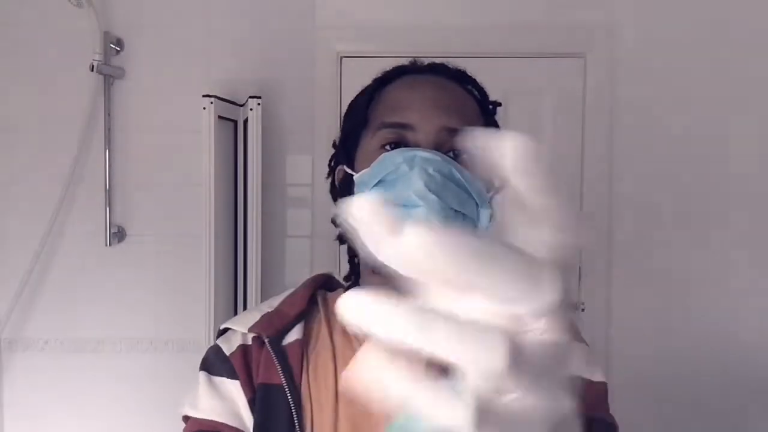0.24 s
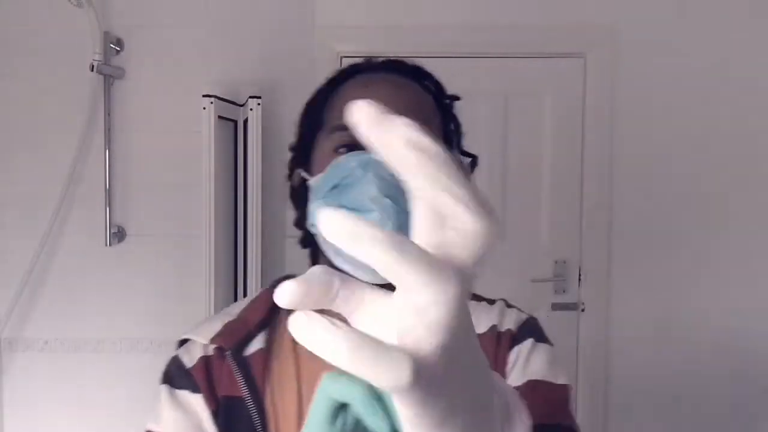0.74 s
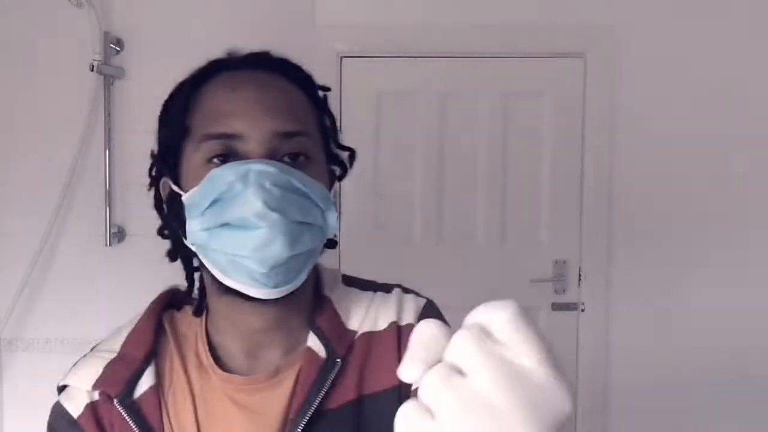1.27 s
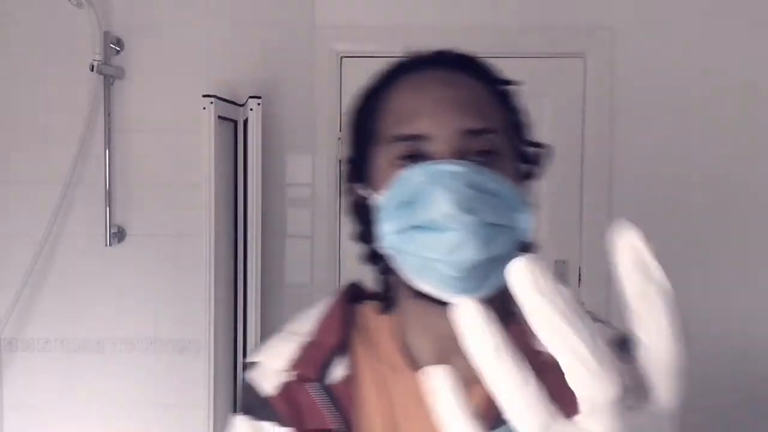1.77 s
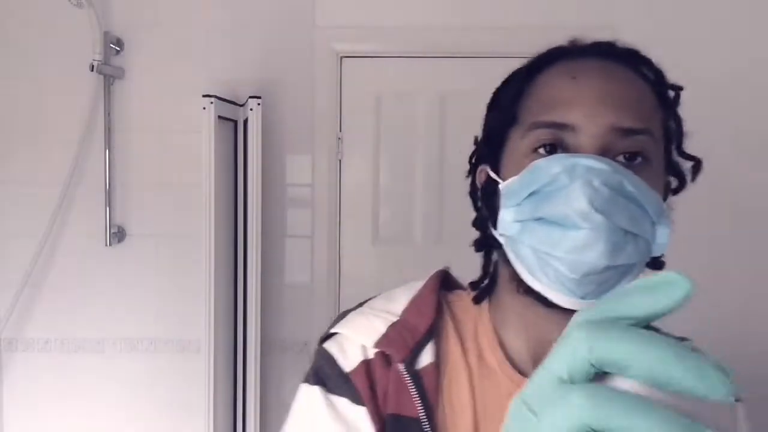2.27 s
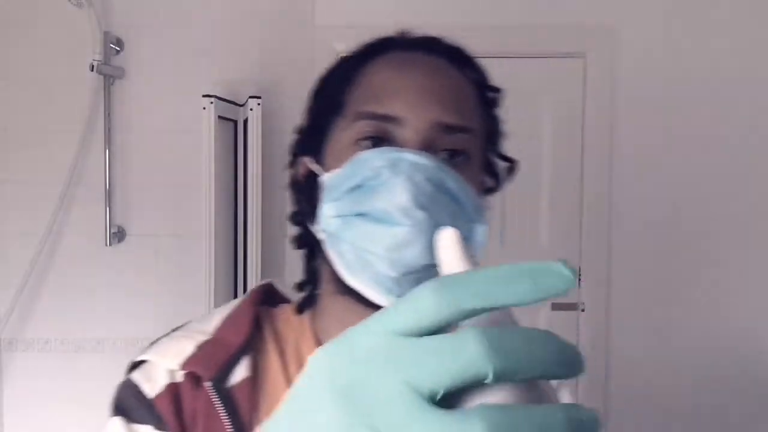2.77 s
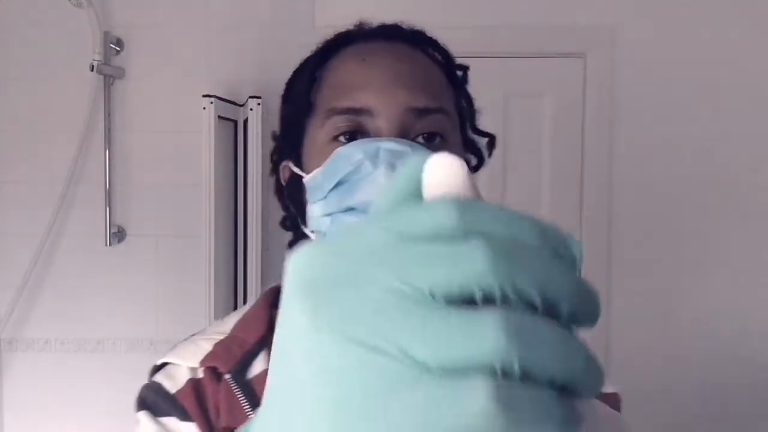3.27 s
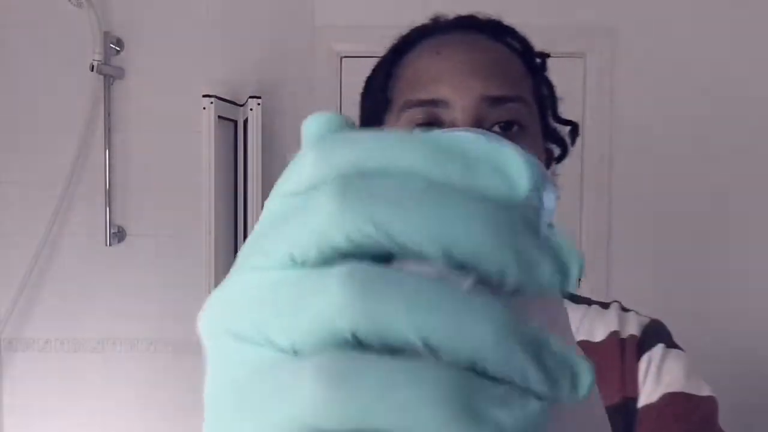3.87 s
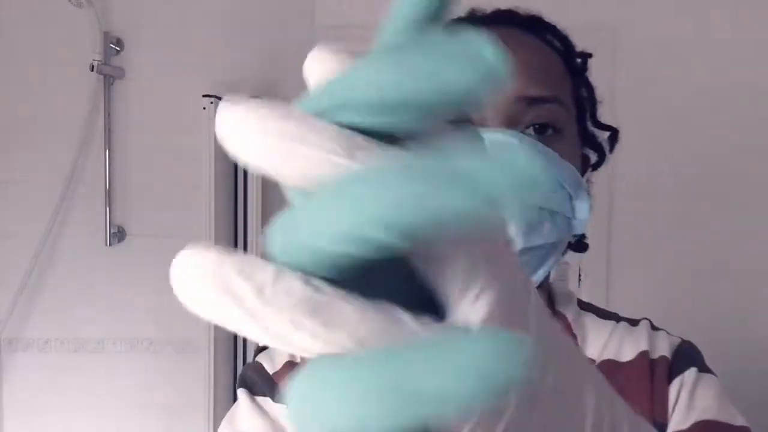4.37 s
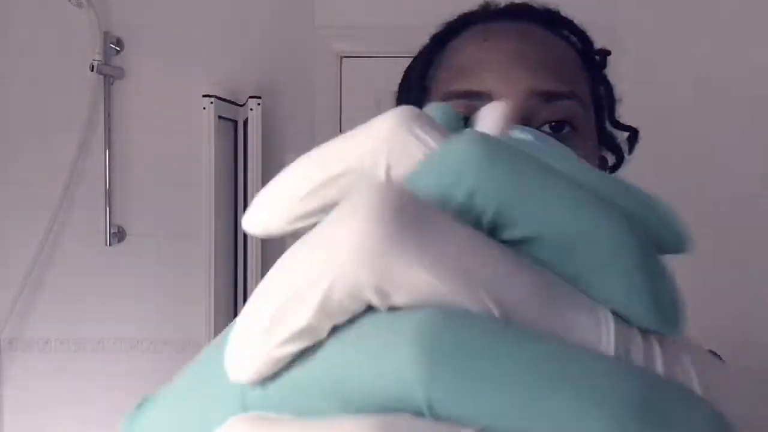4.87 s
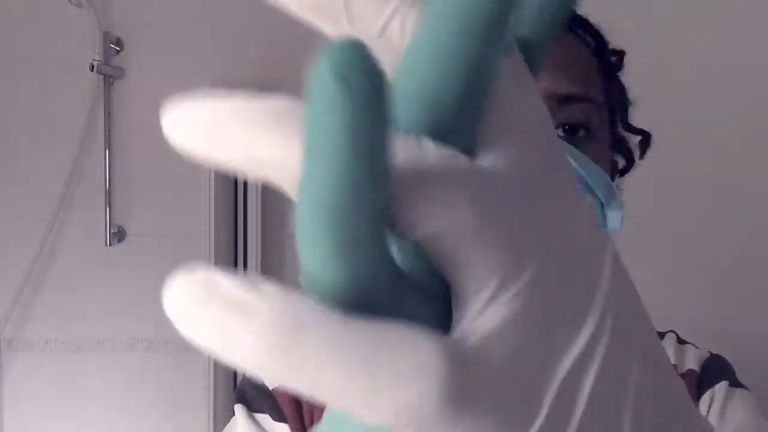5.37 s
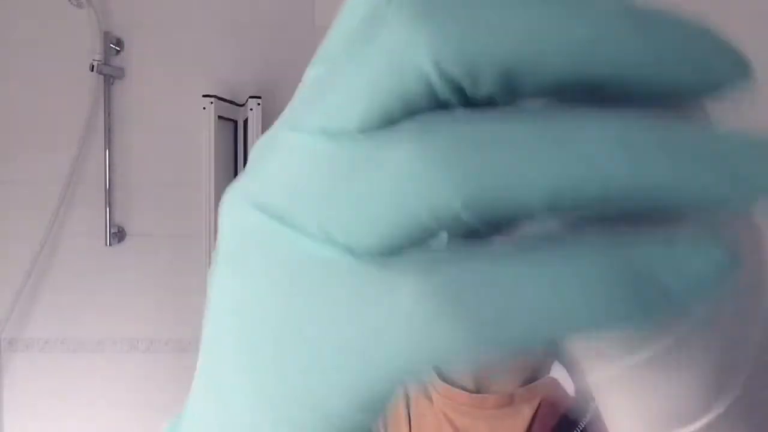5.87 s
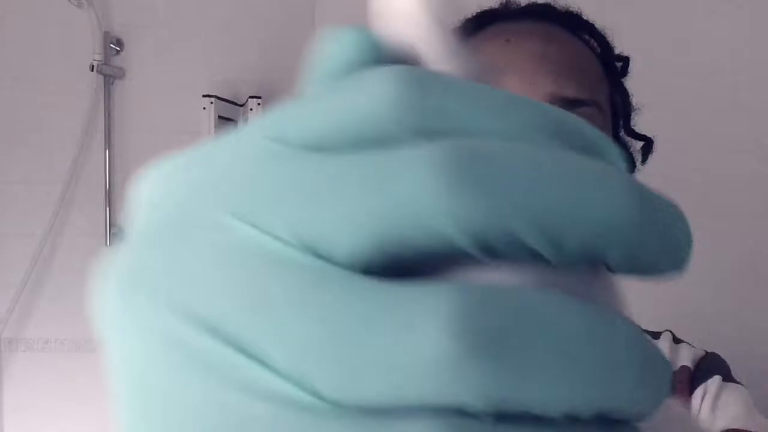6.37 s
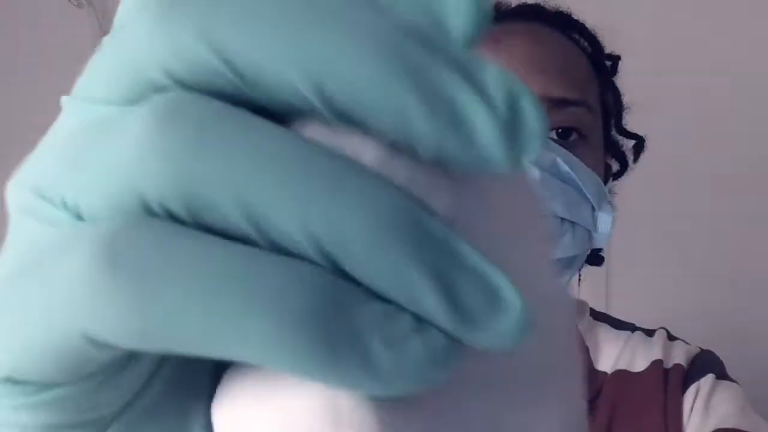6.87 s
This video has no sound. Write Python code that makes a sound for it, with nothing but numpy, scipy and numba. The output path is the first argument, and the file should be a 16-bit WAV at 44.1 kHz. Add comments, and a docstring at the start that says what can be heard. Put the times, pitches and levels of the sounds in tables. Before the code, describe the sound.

Latex gloves rubbed, crinkled and snapped close to a microphone in a small tiled room, building from faint rustles to loud, sharp cracks.

```python
"""Latex gloves are worked over two hands close to a microphone in a small tiled room.
Snaps of latex are noise bursts: an air pocket rings, with a smack, a crack and a slap around it;
a few are only rough grains in ringing tails and a thud. Stick-slip grains make swells of rub and hiss,
filtered noise a low rustle: mostly strokes, also room tail. Air puffs are decaying low swings.
Feet thud in the room's standing waves; tiles ring on as decaying noise over a low building rumble."""
import sys
import numpy as np
from scipy import signal
from scipy.io import wavfile
from numba import njit

SR = 44100
rng = np.random.default_rng(int(sys.argv[2]) if len(sys.argv) > 2 else 0)


def put_to_file(sound):
    """Save the sound as 16-bit audio at rate SR, in the file named by the first command-line argument."""
    columns = np.atleast_2d(sound).T  # one column per channel
    safe = np.clip(columns, -1, 1)
    whole_steps = np.round(safe * 32767)
    wavfile.write(sys.argv[1], SR, whole_steps.astype(np.int16))


N = 314860   # length in samples


def amp(db):
    """Decibels to gain."""
    return 10 ** (np.asarray(db) / 20)


def rms_one(x):
    """Scale to unit rms."""
    return x / np.sqrt(np.mean(x ** 2) + 1e-20)


def peak_one(x):
    """Scale to unit peak."""
    return x / np.max(np.abs(x))


def at_hz(points, hz):
    """Read a table on a log-frequency axis."""
    table_hz, values = np.transpose(points)
    return np.interp(np.log(hz), np.log(table_hz), values)


def in_time(rows):
    """Columns of a curve table at every sample."""
    s, *columns = np.transpose(rows)
    return [np.interp(np.arange(N) / SR, s, column) for column in columns]


def drift(rate_hz):
    """Slow random wander of rms 1: noise through two equal one-pole low-passes at rate_hz."""
    step = 40   # samples between drawn values
    r = np.exp(-2 * np.pi * rate_hz * step / SR)
    noise = rng.standard_normal(N // step + 2002)
    slow = signal.lfilter([1], [1, -2 * r, r * r], noise)[2000:]   # skip the filter's start
    return np.interp(np.arange(N) / step, np.arange(len(slow)), rms_one(slow))


def band_pass(x, low_hz, high_hz):
    """Keep what lies between two frequencies."""
    return signal.sosfilt(signal.butter(2, [low_hz, high_hz], "band", fs=SR, output="sos"), x)


def high_pass(x, hz):
    """Keep what lies above a frequency."""
    return signal.sosfilt(signal.butter(2, hz, "high", fs=SR, output="sos"), x)


def bands(x):
    """Half-octave slices of x with their centres; neighbours come from alternate rows."""
    edges = 22 * 2 ** np.arange(0, 9.9, .5)
    for k, (low, high) in enumerate(zip(edges, edges[1:])):
        yield np.sqrt(low * high), band_pass(x[k % 2], low, high)


def resonance(x, hz, width_hz):
    """Two-pole peak of gain 1."""
    r = np.exp(-np.pi * width_hz / SR)
    feedback = [1, -2 * r * np.cos(2 * np.pi * hz / SR), r * r]
    return signal.lfilter([(1 - r * r) / 2, 0, (r * r - 1) / 2], feedback, x)


@njit
def moving_resonance(x, cosine, r):
    """Two-pole peak whose centre changes every sample."""
    y = np.zeros(len(x))
    for i in range(2, len(x)):
        y[i] = x[i] - x[i - 2] + 2 * r * cosine[i] * y[i - 1] - r * r * y[i - 2]
    return y


def standing_waves(x):
    """The low resonances between the walls."""
    # Each row: frequency in Hz, width in Hz, level in dB.
    room_modes = [(95, 24, -6), (146, 14, -1), (161.7, 18.4, 4.5), (205, 11, 4.5), (230, 12.4, -2),
                  (316, 58, -1), (394, 19.2, -1), (452, 32, -2)]
    return sum((-1) ** k * amp(db) * resonance(x, hz, width_hz)
               for k, (hz, width_hz, db) in enumerate(room_modes))


def swells():
    """Each swell rises, holds and fades; the strongest one sets the shape of the hollow."""
    # Swells of rub, hiss and low rustle: mostly latex strokes, also the room's tail at the start and
    # after the thud. Each row: time it reaches full level in s, hold in s, rub, hiss and rustle in dB
    # ahead of the trims in rubbing(), hollow in Hz, its narrow ring over the broad rub in dB.
    swell_rows = [(0, .02, -44, -43, -53.5, 3080, -27), (0.334, 0.11, -55, -50, -81, 2850, -5),
                  (0.558, 0.05, -58.5, -55, -82, 2590, -8), (0.756, .09, -50, -46, -51.5, 1550, 1),
                  (0.937, .08, -57, -55, -57, 1400, -7), (1.257, 0.036, -49.5, -62.5, -57, 2840, -25),
                  (1.605, .06, -51.5, -67, -65, 1780, -35), (1.869, .08, -54, -49.5, -56, 1140, -8.5),
                  (2.371, .1, -55.5, -60, -47, 1190, -18), (2.619, .2, -52, -49, -57, 2520, -29),
                  (2.985, .06, -50, -60, -61, 2400, -0.5), (3.324, .18, -56, -48, -67, 2390, -5),
                  (3.568, .08, -48, -68, -78, 2240, -2), (3.729, .02, -42.5, -37, -52, 2280, -10),
                  (3.874, .05, -50.5, -43, -60, 2900, 5.5), (3.998, 0.064, -40, -35, -47.5, 1840, -4.5),
                  (4.42, .17, -64, -49, -68, 1660, -20), (4.613, .2, -57, -46.5, -60.5, 1520, 3.5),
                  (4.87, .07, -43, -34.5, -47.5, 1580, 0), (5.036, .08, -54, -54, -61, 1500, -3.5),
                  (5.266, .03, -55, -55, -80, 3900, -4), (5.491, .03, -47.5, -52, -60, 3000, -25),
                  (5.836, .03, -63.5, -40, -64, 2720, -19), (5.972, 0.065, -53.5, -45, -61, 2870, 0),
                  (6.121, .02, -48, -42, -71, 2770, -7), (6.236, .07, -49.5, -41, -53.5, 2540, 0.5),
                  (6.469, .12, -48, -43, -61, 1940, 0), (6.618, .12, -40, -63, -64, 1960, -6),
                  (6.796, .08, -46, -40, -57, 1930, 2.5), (6.971, .17, -39.5, -32, -48, 2970, 0)]
    # Rub, hiss and rustle between swells, in dB ahead of the same trims.
    resting_db = (-65.5, -57, -65)
    rises_db_per_s, fall_db_per_s = (280, 193, 500), 120   # rise of rub, hiss and rustle; common fall
    open_db = -8   # narrow ring of the hollow between swells

    t = np.arange(0, N + 64, 64) / SR
    s, hold, *levels_db, hz, closed_db = np.transpose(swell_rows)[..., None]
    fall_db = fall_db_per_s * np.maximum(t - s - np.abs(hold), 0)
    powers = [amp(db - rise * np.maximum(s - t, 0) - fall_db) ** 2
              for db, rise in zip(levels_db, rises_db_per_s)]
    gains = [np.sqrt(power.sum(axis=0) + amp(rest_db) ** 2)
             for power, rest_db in zip(powers, resting_db)]

    # The steep power lets the strongest rub decide.
    lead, rest = powers[0] ** 4, amp(resting_db[0]) ** 8
    total = lead.sum(axis=0)
    hollow_hz = np.sum(lead * hz, axis=0) / total
    ring_db = (np.sum(lead * closed_db, axis=0) + rest * open_db) / (total + rest)
    return [np.interp(np.arange(N) / SR, t, curve) for curve in gains + [hollow_hz, ring_db]]


def grains(per_s, spread_db):
    """Two rows of random slips of uneven size on a bed of noise."""
    uneven = amp(spread_db * np.minimum(rng.exponential(1, (2, N)), 3.5))
    sizes = uneven * rng.standard_normal((2, N))
    slipping = rng.random((2, N)) < per_s / SR
    return sizes * slipping + 0.27 * rng.standard_normal((2, N))


def rubbing(rub_gain, hiss_gain, rustle_gain, hollow_hz, ring_db):
    """Stick-slip grains make a hiss and ring in the hollow between the hands; a rustle lies below."""
    slips = grains(per_s=2000, spread_db=-0.5)
    cosine = np.cos(2 * np.pi * hollow_hz / SR)
    ring = rms_one(moving_resonance(slips[1], cosine, np.exp(-np.pi * 220 / SR)))     # 220 Hz wide
    broad = rms_one(moving_resonance(slips[0], cosine, np.exp(-np.pi * 2200 / SR)))   # 2200 Hz wide
    rub = amp(ring_db + 1.9 * drift(18.0)) * ring + broad

    hiss = band_pass(slips[0], 3500, 8500) + 1.2 * high_pass(slips[1], 8000)

    low_noise = resonance(rng.standard_normal(N) * amp(3.1 * drift(28.0)), 387, 360)
    rustle = rms_one(standing_waves(low_noise)) + .5 * rms_one(low_noise)

    mix = amp(-5.5) * rub_gain * rub
    mix += amp(-12.5) * hiss_gain * rms_one(hiss)
    return mix + amp(-2.5) * rustle_gain * rustle


def rumble():
    """Building rumble and microphone hiss: shaped noise whose half-octave bands flicker a little."""
    # Each row: frequency in Hz, relative level in dB per Hz.
    spectrum = [(15, -41), (25, -6), (92, 14), (141, 5), (384, 1), (575, -14), (911, 4), (2690, -17),
                (4030, -0.5), (7710, -23), (8590, -69), (14800, -30), (16000, -39)]
    level_db, flicker_db, flicker_hz = -60.5, 4.0, 13.4   # overall rms; spread and rate in each band
    noise = rng.standard_normal((2, N))
    shaped = sum(amp(at_hz(spectrum, hz) + flicker_db * drift(flicker_hz)) * part
                 for hz, part in bands(noise))
    return amp(level_db) * rms_one(shaped)


def crinkles(rub_gain, count):
    """Small random snaps, more often and louder where the rub swells; rows as for the snaps."""
    top_db, follows = -47.5, 0.7   # loudest pocket at the median rub; share of the rub's swing in dB
    draw = rng.random((count, 6))
    busy = (rub_gain / np.median(rub_gain)) ** follows
    at = np.searchsorted(np.cumsum(busy) / np.sum(busy), draw[:, 0])
    at = np.clip(at, 100, N - 1)
    db = top_db + 20 * np.log10(busy[at]) - 8 * draw[:, 1]
    pocket_hz = 1400 * 5 ** draw[:, 2]
    sheet_db, crack_db = -12 * draw[:, 5], 18 * draw[:, 3] - 15
    ms = .5 + 2.9 * draw[:, 4]
    return np.transpose([at / SR, db, pocket_hz, sheet_db, crack_db, ms])


def snaps(rows):
    """Each snap is a noise spray: an air pocket rings, a crack sits above, skin slaps below."""
    # Hands to microphone, setting the room's share. Each row: time in s, distance in m.
    distance = [(0, 0.26), (.74, .6), (.8, 0.24), (1.2, 0.61), (1.6, 0.38), (2.6, 0.24), (2.8, 0.27),
                (3.0, 0.41), (3.55, 0.15), (4.1, 0.17), (4.6, 0.31), (4.9, 0.19), (5.8, 0.17), (5.96, 0.24),
                (6.1, 0.17), (6.7, 0.088), (7.14, 0.14)]
    room_at_1_m_db = 4   # what goes to the walls against the snap; grows with distance
    slap_at_30_db, slap_follows = -16.5, 0.62   # slap against a -30 dB pocket; its dB growth per pocket dB
    size, peel = 640, 66   # samples in a snap, and the sample where it breaks out

    near, sent = np.zeros(N + size), np.zeros(N + size)
    t = (np.arange(size) - peel) / SR
    metres, = in_time(distance)
    click = (np.arange(size) == peel) * 1.
    build = np.where(t < 0, .5 * np.exp(t / 0.00041), 1)   # a creak grows just before the snap
    noise = rng.standard_normal((len(rows), size))
    for (s, db, pocket_hz, sheet_db, crack_db, ms), burst in zip(rows, noise):
        slap_db = slap_at_30_db + (slap_follows - 1) * (db + 30)
        room = amp(room_at_1_m_db) * metres[round(s * SR)]
        spray = burst * build * np.exp(-1000 * np.maximum(t, 0) / max(ms, .15))
        # A quick release flips in one sharp swing.
        spray[[peel + 8, peel + 11]] += np.array([-1, 1]) * 1.61 / max(ms, .4)
        both = np.array([spray, click])   # the walls get the smooth mean over all directions

        # Signs alternate so that neighbours add.
        pocket = resonance(both, pocket_hz, 0.26 * pocket_hz)
        sheet = resonance(both, 1270, 3960)
        crack = -high_pass(both, 7000)
        slap = -band_pass(both, 200, 900)
        levels_db = db + np.array([0, sheet_db, crack_db - 7, slap_db])

        at = round(s * SR) - peel
        for part, part_db in zip([pocket, sheet, crack, slap], levels_db):
            heard = amp(part_db) * peak_one(part[0])
            near[at:at + size] += heard
            sent[at:at + size] += room * np.std(heard) * rms_one(part[1])
    return near[:N], sent[:N]


def tiled_room(x):
    """Dense echoes as noise that dies band by band, starting after the trip to the nearest wall."""
    # Each row: frequency in Hz, time to fall by 60 dB in s.
    decay = [(100, 0.66), (260, 0.48), (700, 0.42), (1840, 0.17), (4850, 0.27), (12800, 0.3)]
    # Each row: frequency in Hz, relative starting level in dB per Hz.
    colour = [(100, 1), (400, -0.5), (1500, 7), (4000, 0.5), (8000, 3), (14000, -4)]
    t = np.arange(SR) / SR
    echoes = sum(amp(at_hz(colour, hz) - 60 * t / at_hz(decay, hz)) * part
                 for hz, part in bands(rng.standard_normal((2, SR))))
    echoes = echoes * np.clip((t - .002) / 0.00056, 0, 1)   # silent for 2 ms, then a quick rise
    return signal.fftconvolve(x, echoes / np.sqrt(np.sum(echoes ** 2)))[:N]


def puffs():
    """Air squeezed out is one soft pressure push: a heavily damped low swing, its top softened."""
    # Air from between the palms onto the microphone. Each row: start in s, peak in dB, centre in Hz.
    puff_rows = [(.74, -37, 302), (0.806, -33.5, 380), (1.197, -30.5, 383), (3.728, -38.5, 266),
                 (3.908, -41, 450), (3.978, -22.5, 516), (4.64, -41.5, 520), (4.869, -30.5, 334),
                 (4.947, -36, 340), (5.502, -45, 90.5), (5.964, -44, 214), (6.092, -27, 426),
                 (6.21, -21, 384), (6.69, -36, 348), (6.788, -28.5, 161), (6.962, -34, 205),
                 (7.039, -32, 275), (7.091, -21, 275)]
    out = np.zeros(N)
    for s, db, hz in puff_rows:
        at = round(s * SR)
        swing = resonance((np.arange(2000) == 0) * 1., hz, 0.54 * hz)
        swing = peak_one(signal.lfilter([.05], [1, -.95], swing))[:N - at]
        out[at:at + len(swing)] += amp(db) * swing
    return out


def thuds():
    """A rough push of the sole, hardest at first: a knock, and a boom in the standing waves."""
    # Weight put on the floor. Each row: start in s, peak in dB, lowest and brightest Hz of the push,
    # decay time in ms, knock over boom in dB.
    thud_rows = [(1.61, -28, 94, 320, 55, -4), (2.359, -31, 254, 1170, 23, -10),
                 (2.411, -36.5, 69, 214, 40, -1.5)]
    out, size = np.zeros(N), SR // 2
    t = np.arange(size) / SR
    noise = rng.standard_normal((len(thud_rows), size))
    for (s, db, low_hz, bright_hz, ms, knock_db), rough in zip(thud_rows, noise):
        push = rough * (np.exp(-1000 * t / ms) + 1.3 * np.exp(-t / 0.014))
        knock = band_pass(push, low_hz, bright_hz)
        thud = rms_one(standing_waves(knock)) + amp(knock_db) * rms_one(knock)
        at = round(s * SR)
        out[at:at + size] += amp(db) * peak_one(thud)
    return out


def scene():
    """One microphone hears hands, floor, tiles and rumble; both channels carry it."""
    # Clear snaps of latex, with rough grains in the ringing tails and in the thud.
    # Each row: time in s, pocket peak in dB, air pocket in Hz, broad smack of the sheet in dB over
    # the pocket, crack on top in dB over 7 dB below the pocket, decay time in ms (at least 0.15 is used).
    snap_rows = [(.1006, -39.5, 7490, -10, 12.5, .37), (.202, -39, 4560, -17, 2, 0.62),
                 (.2152, -38.5, 7040, -11, 14, 0.27), (.434, -34, 6700, -15, 11.5, 0.28),
                 (.7397, -16, 6300, 3, -19, 0.4), (.806, -24.5, 990, -0.5, -21, 1.2),
                 (.9445, -45, 2460, -6, 15, .41), (1.164, -52, 7260, -12, 2, 0.44),
                 (1.1961, -26, 3420, -5.5, 8.5, 3.4), (1.5467, -25, 6660, -6, 16, 0.41),
                 (1.5608, -34, 7490, -9, 25, .2), (1.5054, -49, 2860, -10, -5, 2.1),
                 (1.593, -32, 7440, -12, 14, 0.63), (1.5686, -29, 4170, 4.5, 11, 1.3),
                 (1.909, -46.5, 3040, -4, 17, 3.2), (2.1049, -40.5, 1530, -1, 12.5, .48),
                 (2.3386, -42.5, 5100, -1, 15, 1.2), (2.3641, -49, 1070, -11, -23, 2.1),
                 (2.381, -46, 800, -16, -22, 1.9), (2.6227, -34.5, 4300, -1, -7, 1.8),
                 (2.6282, -39, 4690, 2, 4, 1), (2.6814, -41.5, 3720, -6, 5, .9),
                 (2.6658, -40, 5770, -12, -13, .6), (2.7239, -32.5, 2530, -3, -28, 2.3),
                 (2.783, -27, 3600, -3, -21, 1.64), (2.839, -39, 3530, 5, -2, 0.51),
                 (2.9659, -27, 2270, -1.5, 13.5, 1.17), (2.9705, -25.5, 1650, -12, -18, .57),
                 (2.976, -32, 7300, 0, 10, 0.53), (3.1728, -50, 6240, 6, -9, 0.91),
                 (3.4142, -40, 6500, -8, -6, 0.18), (3.4342, -39, 1990, -2, 5, .83),
                 (3.4944, -40.5, 3140, -4, 11, 1.14), (3.587, -21.5, 1810, -44, -46, 1.9),
                 (3.6116, -30, 2050, -7, -21, 1.2), (3.6172, -34.5, 7360, 1, -7, 1.5),
                 (3.6852, -38, 3960, -16, -14, .59), (3.7018, -32, 5800, -2, 9, 2),
                 (3.715, -17.5, 4960, -8, 9, 0.15), (3.725, -22.5, 1950, -17, 6, 1.34),
                 (3.738, -16, 7200, 0, 10, .3), (3.745, -25.5, 4470, -15, 15, 0.45),
                 (3.8597, -21, 2860, -6, -16, 0.59), (3.867, -33, 2970, -16, -18, 1.2),
                 (3.9125, -26.5, 2530, 1, -21, 4.1), (3.9256, -22, 4800, -16, -20, .45),
                 (3.9709, -27, 3180, -8, -2, 2.3), (3.9785, -19.5, 850, 5.5, -25, 1.77),
                 (3.9857, -30, 4220, -4, -9, 2.2), (4.004, -22, 1580, 0, 13, 0.4),
                 (4.0128, -26, 1640, -4, 14.5, 1.2), (4.0231, -25, 3650, -8, -12, 3.7),
                 (4.03, -26, 4100, -6, 1, 2.7), (4.039, -23, 4650, -15, -14, 0.69),
                 (4.0484, -22.5, 3530, -6, -15, 1.5), (4.0573, -22.5, 5070, -17, 5, 1.4),
                 (4.0654, -29, 1510, -11, -12, 0.91), (4.1482, -39.5, 6350, -6, 17, 0.71),
                 (4.1593, -37.5, 4270, -9, 14, 1.3), (4.2827, -38, 7600, -19, 20, 1.4),
                 (4.287, -38.5, 4640, -11, -10, 1.1), (4.3401, -41.5, 1470, 5.5, -10, 0.65),
                 (4.4215, -36, 5140, -8, -15, 0.22), (4.4825, -34.5, 4300, -10, -19, 1.6),
                 (4.5436, -40, 7260, 2.5, 19, 0.9), (4.6048, -34.5, 3420, -14, 1, 0.85),
                 (4.7117, -35.5, 1500, -6, -6, 1.6), (4.8094, -43.5, 1370, 1.5, 11, 2.7),
                 (4.8552, -34, 3220, -2, 11, 1.6), (4.8699, -17.5, 1480, 2.5, -1, 1.9),
                 (4.8873, -24.5, 1520, -4, -9, 2), (4.9105, -22, 3020, 3.5, -27, .66),
                 (4.9506, -19, 1520, -12, 9, 0.95), (4.9972, -25.5, 1280, 7, -17, 0.12),
                 (5.079, -39.5, 1550, 2, -11, 0.84), (5.1186, -43, 1530, -3, -27, 2.1),
                 (5.2565, -17, 3650, -32, -48, 1.26), (5.2725, -45, 4300, -21, -18, 0.53),
                 (5.293, -33, 3380, 1, -33, 0.83), (5.3418, -45, 3450, 4, 13, 2),
                 (5.3565, -39.5, 5860, 0.5, -14, 3.2), (5.4018, -47, 7490, -11, 20, 0.23),
                 (5.4715, -32.5, 3700, -5, -22, 1.7), (5.487, -26.5, 3800, 4, 10, 1.4),
                 (5.5054, -25, 3280, 2, -28, 1.1), (5.5078, -28.5, 6600, -3, -12, 2.6),
                 (5.5383, -25, 6940, -10, 17.5, 0.43), (5.76, -41, 4140, -15, -15, .87),
                 (5.8436, -40.5, 6910, 1, 25, 0.15), (5.8474, -31, 6170, -11, -10, 1.1),
                 (5.9485, -15, 5900, -8, -7, 0.28), (5.966, -17, 6850, -7, 3, 0.18),
                 (5.9817, -39.5, 910, 13, -2, 2.1), (5.9914, -29.5, 3370, -17, 2, 1.4),
                 (6.0623, -33, 7490, 1, 9, 1.7), (6.0927, -23.5, 6850, 5.5, -25, 2.7),
                 (6.1243, -28.5, 4230, 2.5, 12, 0.75), (6.2085, -25, 2500, 7.5, -22, 3.8),
                 (6.213, -6.5, 2940, -6, 13.6, 0.73), (6.2197, -15, 6950, -27, 0, 1),
                 (6.4265, -40.5, 3360, -4, 11, 0.92), (6.4781, -31.5, 1950, -2.5, -23, 1.9),
                 (6.5038, -26, 3400, -27, -27, 0.79), (6.6505, -32.5, 2700, -14, -6, 1.3),
                 (6.6624, -28, 2600, 6.5, -26, 1.9), (6.6901, -18, 1950, 6, 14, 0.54),
                 (6.7051, -29, 3330, -11, -6, 2.8), (6.7266, -21.5, 4930, 4, 12, 0.71),
                 (6.7468, -22.5, 2880, -7, 16, 0.55), (6.7577, -26, 3000, 5, 0, 1.45),
                 (6.7709, -18, 5560, 8.5, -6, 2.3), (6.7764, -23, 5900, -9, -5, 1.2),
                 (6.7803, 0, 8100, -11, 8, 0.37), (6.7835, -9, 3060, -21, -7, 3.8),
                 (6.7848, -7, 1780, -29, 8, 0.55), (6.7993, -32, 2100, -10, 0, 2.2),
                 (6.9389, -31, 2070, -3, -8, 1.5), (6.9505, -24, 3490, 4, 11, 1.2),
                 (6.9646, -8, 6400, -3.5, 9.5, 0.97), (6.976, -25.5, 3000, -19, -18, .96),
                 (6.9971, -22.5, 1780, 4, -10, 0.96), (7.002, -20.5, 5160, -4, -12, 1.9),
                 (7.0172, -16.5, 3120, -11, 16, 1.2), (7.0386, -13, 3750, -6, 11, 0.7),
                 (7.0415, -22, 3220, -10, -14, .53), (7.045, -17, 1710, 2, 4, 1.05),
                 (7.0609, -8, 3700, -22, -24, 0.36), (7.0714, -26, 5060, 8, -6, 1.1),
                 (7.0836, -3.5, 3180, -1.5, -19, 1.07), (7.0927, -6.5, 3270, 0.5, -20, 2.2),
                 (7.1017, -4.5, 3460, -7, -26, 1.4), (7.115, -32, 3900, -9.5, -8, 0.95),
                 (7.1254, -23, 3210, -12, -12, 0.52)]
    slide = swells()
    near, sent = snaps(np.vstack([snap_rows, crinkles(slide[0], count=70)]))
    steps = thuds()
    room = tiled_room(sent + amp(-4) * steps)
    mono = rubbing(*slide) + rumble() + near + puffs() + steps + room
    return np.array([mono, mono])


def record(dry):
    """Peaks are clipped at full scale; two steep low-passes take off the top."""
    clipped = np.clip(dry, -1, 1)
    # Order, depth of the cut in dB, and the Hz where that depth is reached.
    cut = signal.sosfilt(signal.cheby2(12, 32, 15500, fs=SR, output="sos"), clipped)
    return signal.sosfilt(signal.cheby2(8, 28, 16900, fs=SR, output="sos"), cut)


dry = scene()
out = record(dry)
put_to_file(out)
```